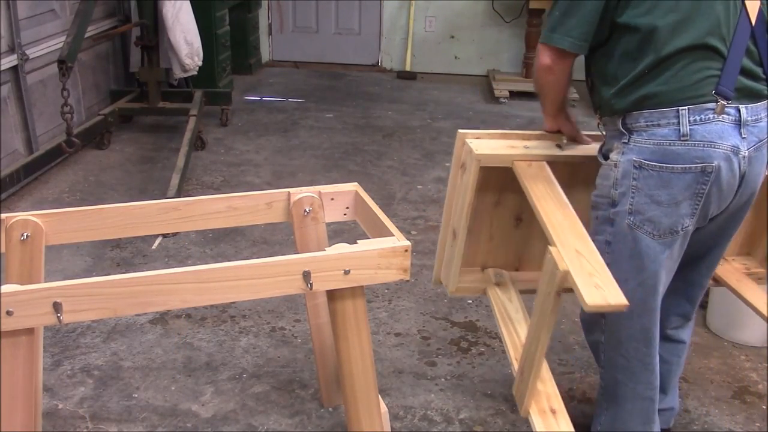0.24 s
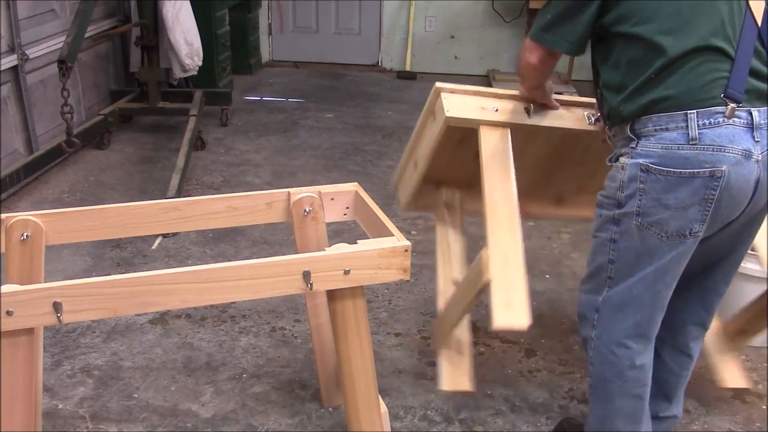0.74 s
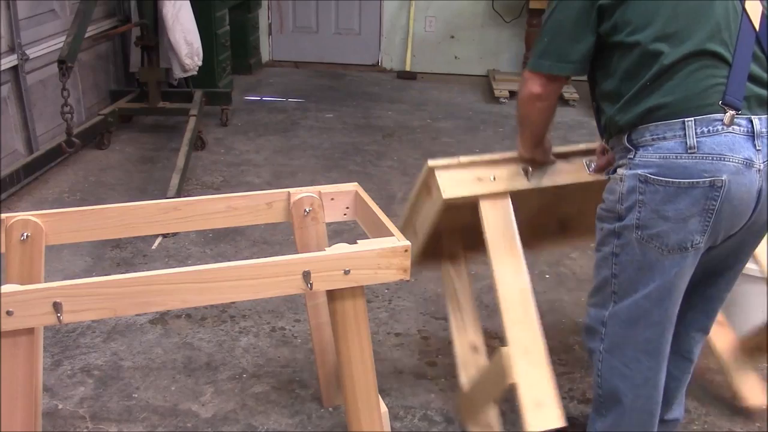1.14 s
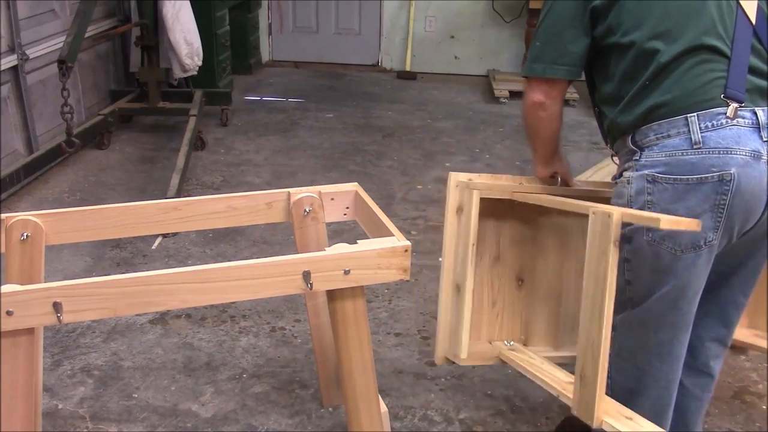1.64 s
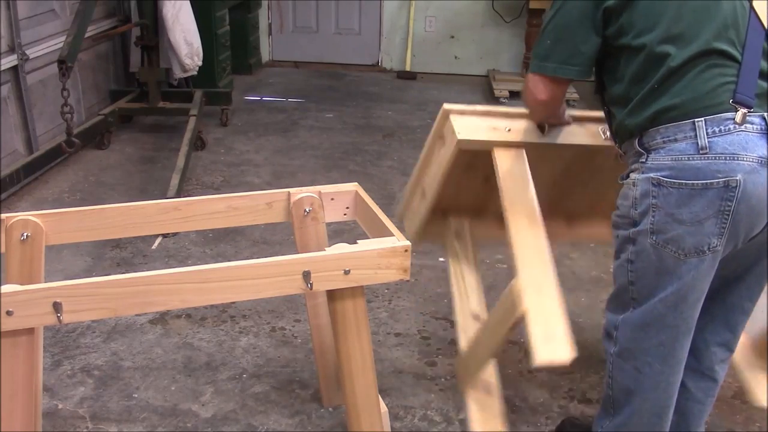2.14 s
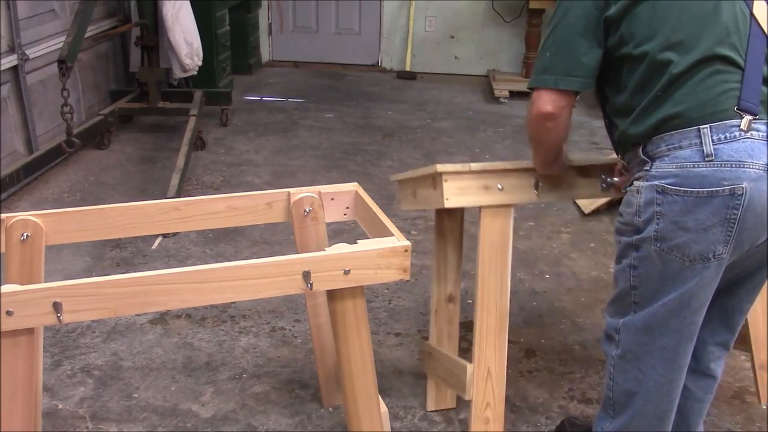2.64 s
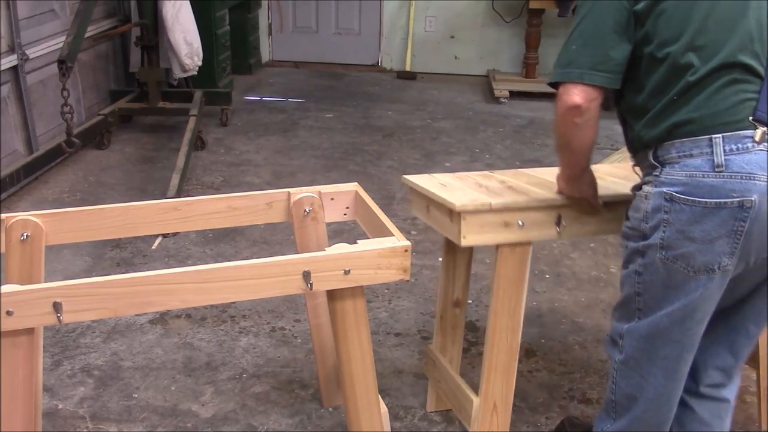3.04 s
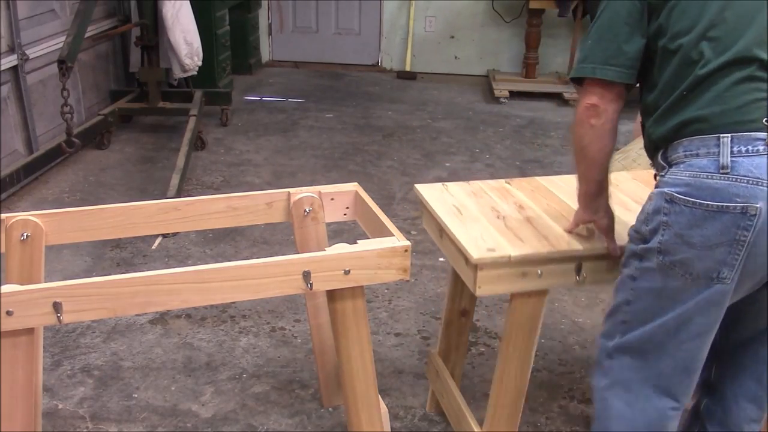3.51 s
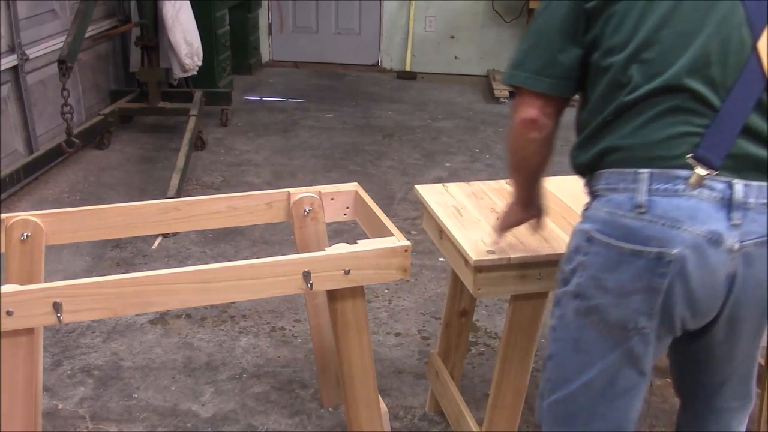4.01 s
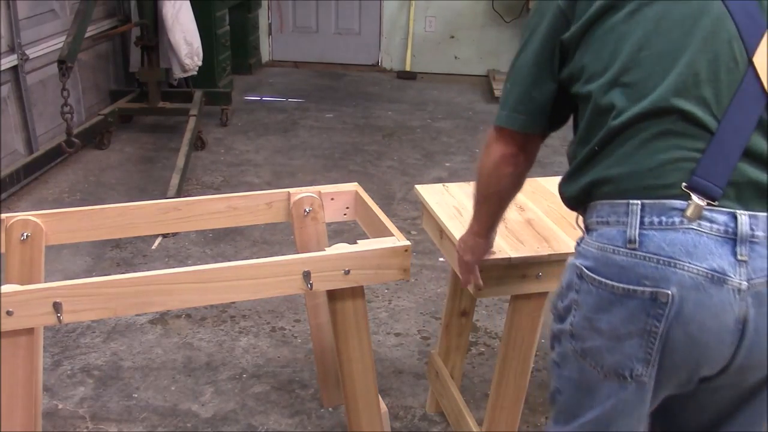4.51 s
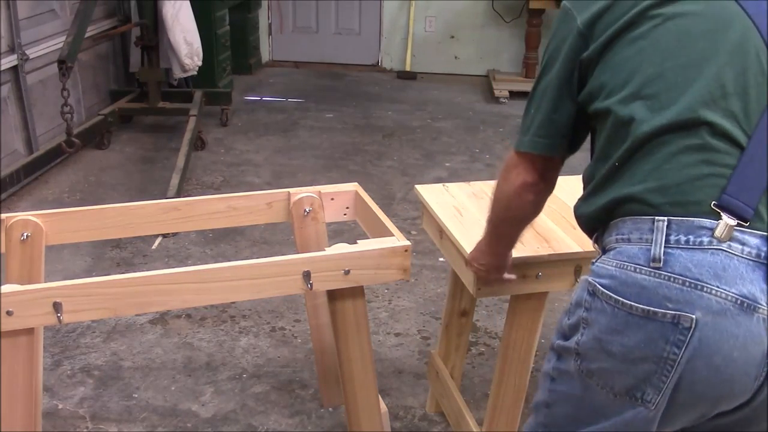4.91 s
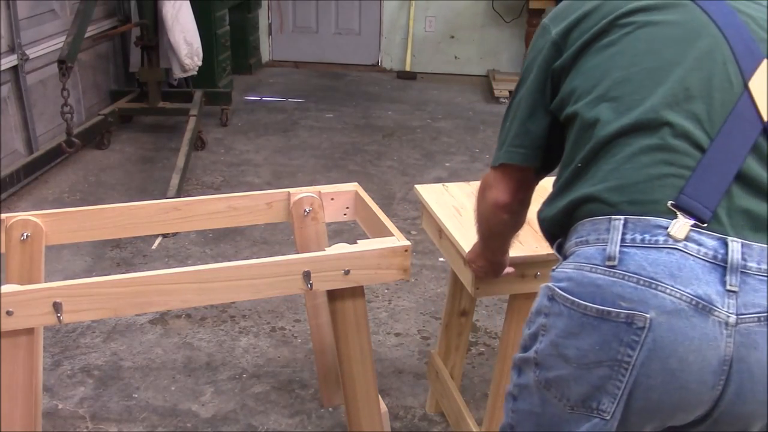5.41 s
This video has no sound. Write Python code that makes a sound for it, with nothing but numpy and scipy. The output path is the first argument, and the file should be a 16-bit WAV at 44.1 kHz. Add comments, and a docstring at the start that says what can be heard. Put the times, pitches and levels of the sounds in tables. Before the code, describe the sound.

A fan hums steadily in a hard, echoing workshop. Close to the microphone, a wooden table gives a quick cluster of knocks with leg judder, then after a pause a louder clattering landing on concrete. Gritty shoe scuffs follow, then a softer, boomier run of thumps, more scuffs and bright ticks, and at the end a short groaning wood scrape with small knocks.

```python
"""A fan drones with a wavering blade tone under thin airy hiss; then a wooden folding table is knocked,
set down and dragged on a concrete workshop floor. Blows ring table modes; judder and drag drive them with
random slips. Fittings tick (short noise bursts); airy hisses carry a thin gliding whistle; shoes scuff grit
(patchy filtered noise). Decaying noise makes the hall echo; gain control ducks loud blows."""
import sys
import numpy as np
from scipy import signal
from scipy.fft import rfft, irfft, next_fast_len
from scipy.io import wavfile
from scipy.ndimage import uniform_filter1d, minimum_filter1d, map_coordinates

SR = 44100
rng = np.random.default_rng(int(sys.argv[2]) if len(sys.argv) > 2 else 0)


def to_wav(s):
    """Save 16-bit WAV."""
    ch = np.atleast_2d(s).T  # columns
    pcm = np.round(np.clip(ch, -1, 1) * 32767)  # PCM
    wavfile.write(sys.argv[1], SR, pcm.astype(np.int16))


def invert_db(x):
    """Field ratio 10**(x/20) for x, a level in decibels (scalar or array-like)."""
    u = np.asarray(x, float) / 20
    return 10 ** u


N = 249606

# blows on the table: (time [s], relative strength [dB], boom of the top [dB], clack of the legs [dB],
# contact hardness [dB])
BLOWS = [(0.858, -3, -10, -10.5, -11.5), (0.874, -2.5, -12, -11, -29), (0.916, -11, -10, -9, -15),
         (0.957, -4, -20, -15, -21), (0.98, -10, -15, -15, -19), (1.014, -19, -5, 4.5, -5.5),
         (2.31, -3.5, -8.5, -5, -9.5), (2.34, -18, -4.5, -2.5, -2), (2.377, -8.5, -19, -3, -19),
         (2.396, 3, -4, 0.5, -19), (2.447, -6, 6, -8, -18), (2.475, 0, -25, -7.5, -26),
         (2.5, -1.5, -5, -36.5, -39), (2.525, -6, 0, -8.5, -29), (2.574, -8, 2, -17, -31),
         (3.523, -4.5, -1.5, -4.5, -23), (3.627, -3.5, -1, -4, -39), (3.658, -5, 4.5, -34.5, -43),
         (3.752, -11, -7, -16, -45), (3.793, -11.5, 7, -14, -34.5), (3.858, -11.5, 9, -22, -26),
         (3.909, -2, 3.5, -33, -39.5), (3.927, -6.5, 2, -29, -43.5), (4.134, -10.5, 0.5, -15, -21),
         (4.152, -19, -17.5, -16, -15), (5.336, -27, -19, -2.5, -8), (5.454, -9.5, -32, -17, -19.5),
         (5.486, -8.5, -36, -30.5, -21.5), (5.511, -9.5, -29, -11.5, -19), (5.55, -21.5, -26, -16, -1)]
# table modes, nominal: (frequency [Hz], level [dB], undamped t60 [s])
TABLE_MODES = [(83.4, -12, 0.46), (124, 3, 0.32), (180, -31, 0.05), (192.8, 3, 0.16), (239, -2, 0.1885),
               (258.6, -6.5, 0.2), (333, -1.5, .12), (362.2, -5.5, 0.24), (391.5, 1.5, 0.11),
               (433, -5, 0.097), (477.3, -5, 0.33), (536.2, 1.5, 0.032), (569, 2, 0.033), (674, -4, 0.043),
               (750, 0.5, 0.24), (793, -1, 0.068), (880, 2.5, 0.0363), (991.1, 1.5, 0.079),
               (1108, -3.5, 0.047), (1273, -5.5, 0.0171), (1682, -6, 0.072), (1843, -8.5, 0.048),
               (1954, -11, 0.054), (2395, -8.5, 0.079), (2910, -9.5, 0.0326), (3100, -29, 0.033),
               (3670, -15.5, 0.11), (4040, -11, 0.021)]
# legs juddering over the floor: (start [s], length [s], start level [dB], end level [dB],
# initial harshness [dB])
JUDDERS = [(.856, 0.256, -9.5, -27, -13.5), (2.309, 0.083, -11.5, -16, -7.5), (2.4, .32, -14.5, -29, -13.5),
           (3.625, 0.094, -16, -27, -28), (3.75, .19, -30, -25.5, -31.5)]
# loaded table dragged along: (start [s], length [s], start level [dB], end level [dB], joint rattle [dB])
DRAG_SPELLS = [(5.45, 0.094, -15, -14.5, -22), (5.55, 0.124, -10.5, -6.5, -19)]
# fittings and grit ticking: (time [s], relative level [dB], pitch [Hz])
TICK_EVENTS = [(0.7397, -28, 7800), (0.8224, -32.5, 3680), (0.9175, -12, 4060), (0.959, -10.5, 4470),
               (1.1305, -29, 3790), (2.442, -20, 3480), (2.4413, -7, 10300), (2.499, -15.5, 4060),
               (3.7938, -28.5, 6660), (4.3107, -5, 6300), (4.3153, -11, 8300), (5.548, -27, 3110)]
# airy hisses with a thin whistle: (start [s], length [s], start level [dB], end level [dB],
# nominal whistle [Hz])
HISS_SPELLS = [(0.02, 0.3, -46.5, -44.5, 12200), (.455, 0.029, -58, -55, 12000),
               (2.447, 0.24, -33, -52.5, 10350)]
# resonances of the hiss: (centre [Hz], width [Hz], level [dB])
HISS_PEAKS = [(2225, 270, -1.5), (5917, 470, -1.5), (8580, 680, -2.5), (10450, 980, -4), (12200, 1200, -7)]
# soles on concrete: (fastest moment [s], relative peak [dB], 20 dB rise [s], 20 dB fall [s],
# centre at the peak [Hz]); the sign of a rise has no effect
SOLE_SLIDES = [(.735, -29, 0.0648, 0.0753, 6200), (1.216, -16.5, 0.1176, 0.1865, 5400),
               (1.44, -27.5, .1, 0.08, 5400), (2.78, -30.5, 0.2, .12, 4700), (2.9, -21, 0.1274, 0.17, 5300),
               (3.125, -37.5, 0.27, .09, 4900), (3.36, -32.5, 0.14, 0.33, 6900),
               (3.5, -23, 0.12, 0.06, 6430), (3.645, -27, 0.01, 0.07, 6200),
               (4.11, -25.5, 0.1053, 0.08, 6220), (4.235, -11, 0.0744, .13, 4600),
               (4.32, -14.5, 0.0507, 0.09, 6200), (4.42, -40, -0.2, .15, 5600), (4.7, -36, -0.2, 0.1, 4400),
               (4.855, -15.5, 0.095, 0.25, 6650), (5.135, -32.5, 0.04, 0.1, 5100)]
# colour of a scuff: (frequency [Hz], density [dB per Hz])
SOLE_COLOUR = [(880, -10), (1500, -13), (2330, -11.5), (3030, -9.5), (4150, -8), (6310, -10.5),
               (7310, -9.5), (12800, -12.5), (14200, -22), (15500, -29.5)]
# hall decay: (frequency [Hz], t60 [s])
HALL_DECAY = [(100, 0.41), (1000, 1), (4000, 0.63), (12000, 0.56)]
# fan levels: (time [s], air [dB], blade tone [dB])
FAN_LEVELS = [(0, -26.5, -34.5), (.8, -28, -33.5), (1.5, -28, -45), (3, -26.5, -38), (5.66, -27, -41)]
# colour of the fan's air noise: (frequency [Hz], density [dB per Hz])
FAN_COLOUR = [(15, -45), (25, -17.5), (66, -3), (133, -7), (209, -0.5), (410, -1.5), (457, -2), (582, -4),
              (762, -5.5), (848, -6.5), (1300, -13.5), (1620, -19), (1850, -20.5), (11200, -37),
              (14000, -42.5), (15500, -54)]


def unit(x):
    """Scaled to rms 1."""
    return x / np.sqrt(np.mean(x ** 2) + 1e-20)


def along(points, hz):
    """(Hz, value) points read on a log axis."""
    f, v = np.transpose(points)
    return np.interp(np.log(hz + 1), np.log(f + 1), v)


def wobble(rate_hz):
    """Smooth random curve, rate_hz knots a second."""
    knots = rng.standard_normal(int(N * rate_hz / SR) + 4)
    return map_coordinates(knots, [np.arange(N) * rate_hz / SR])


def filtered(x, response):
    """x times a complex response of frequency."""
    m = next_fast_len(N + SR // 2)
    return irfft(rfft(x, m) * response(np.fft.rfftfreq(m, 1 / SR)), m)[:N]


def coloured(x, points):
    """x shaped by (Hz, dB) points."""
    return filtered(x, lambda f: invert_db(along(points, f)))


def resonant(peaks):
    """Causal response of (Hz, width Hz, dB) resonances of alternating sign."""
    def response(f):
        total = 0
        for k, (centre, width, db) in enumerate(peaks):
            damping = 1j * f * width
            total = total + (-1) ** k * invert_db(db) * damping / (centre * centre - f * f + damping)
        return total
    return response


def impulses(per_second, spread_db):
    """Sparse random impulses of uneven size."""
    hits = rng.random(N) < per_second / SR
    return hits * rng.standard_normal(N) * invert_db(spread_db * rng.exponential(size=N))


def spells(rows, fade_s):
    """Gain of all spells; the current one's own value, time since its start and time until its end."""
    t, gain, others = np.arange(N) / SR, np.zeros(N), 0
    for s, length, start_db, end_db, value in rows:
        edge = np.clip(np.minimum(t - s, s + length + fade_s - t) / fade_s, 0, 1)
        gain += edge * invert_db(np.interp(t, [s, s + length], [start_db, end_db]))
        others = np.where(edge > 0, [value + 0 * t, t - s, s + length - t], others)
    return gain, *others


def knocks():
    """Each blow gives a short push and rings every mode anew; hard contact excites high modes and cracks."""
    out, t = np.zeros(N + SR), np.arange(SR // 4) / SR
    hz, level_db, t60_s = np.transpose(TABLE_MODES)[..., None]
    dull = signal.butter(2, 4200, fs=SR)
    for s, db, boom_db, clack_db, hard_db in BLOWS:
        reach_db = along([(150, boom_db), (260, 0), (520, 0), (750, clack_db), (1200, clack_db + 3),
                          (1700, hard_db + 16.5), (4200, hard_db + 6.0)], hz)
        level_luck, pitch_luck, phase_luck = rng.standard_normal((3, len(TABLE_MODES), 1))
        contact_s = 0.0005 * invert_db(-.3 * clack_db)  # a soft landing lasts longer
        u = t / contact_s - 3
        push = (u * u - 1) * np.exp(-u * u / 2)
        rise = 1 - np.exp(-(t / (1.17 * contact_s)) ** 2)
        # a random phase walk in 64-sample steps roughens the higher modes
        walk = np.cumsum(rng.standard_normal((len(TABLE_MODES), len(t) // 64 + 1)), axis=1)
        rough = 0.000235 * hz * walk.repeat(64, axis=1)[:, :len(t)]
        # hands and floor shorten the ring, most when the table lands flat
        ring_t60_s = (.58 - 0.0095 * boom_db) * t60_s
        decay = invert_db(level_db + reach_db + 3.9 * level_luck - 60 * t / ring_t60_s)
        phase = 2 * np.pi * hz * (1 + 0.029 * pitch_luck) * t + rough + 1.577 * phase_luck
        modes = (decay * np.sin(phase)).sum(0)
        noise = signal.lfilter(*dull, rng.standard_normal(len(t)))
        crack = invert_db(hard_db + 16 - 60 * t / 0.037) * noise
        out[round(s * SR):][:len(t)] += invert_db(db - 8) * (invert_db(2) * push + rise * (crack + modes))
    return out[:N]


def shaken(per_second, spread_db, damping, boom_db, clack_db, rattle_db, grit_db):
    """Uneven slips drive each part's share of the modes; noise stands for the grit being ground."""
    slips = impulses(per_second, spread_db)

    def part(low_hz, high_hz):
        peaks = [(c, damping / t60, db) for c, db, t60 in TABLE_MODES if low_hz < c < high_hz]
        return unit(filtered(slips, resonant(peaks)))

    top, frame = part(0, 200), part(200, 600)
    legs, joints = part(600, 1400), part(1400, SR)
    noise = rng.standard_normal(N) * invert_db(1.8 * wobble(60))
    grind = unit(coloured(noise, [(1500, -20), (4000, -6.0), (9000, -9.5), (15000, -18)]))
    wood = invert_db(boom_db) * top + invert_db(-4.5) * frame + invert_db(clack_db) * legs
    return wood + invert_db(rattle_db - 3.5) * joints + invert_db(grit_db) * grind


def judder():
    """Feet stick and slip after a landing; one fading harshness sets the share of each part."""
    gain, harsh_db, since_s, _ = spells(JUDDERS, fade_s=0.0072)
    fade_db_per_s = 66  # dulls as it goes on
    rattle_db = harsh_db - fade_db_per_s * since_s
    boom_db = -20 - 0.53 * rattle_db  # soft, flat contact shakes the top
    clack_db = -1.5 + 0.43 * rattle_db
    grit_db = -15 + 0.56 * rattle_db
    return gain * shaken(1300, 1.5, 4.45, boom_db, clack_db, rattle_db, grit_db)


def drag():
    """Under load the slips come denser and more even, and the frame groans."""
    gain, rattle_db, *_ = spells(DRAG_SPELLS, fade_s=0.0103)
    boom_db, clack_db = -31, -19  # hands on the top damp it: mostly the frame sounds
    return gain * shaken(4000, 0.71, 3.4, boom_db, clack_db, rattle_db, rattle_db - 0.5)


def ticks():
    """Short bright noise bursts, each around one pitch."""
    out, t = np.zeros(N + SR), np.arange(SR // 10) / SR
    f = np.fft.rfftfreq(len(t), 1 / SR)
    t60_s, rise_s = 0.037, 0.00096
    for s, db, hz in TICK_EVENTS:
        colour = 1 / (1 + ((f - hz) / (0.14 * hz)) ** 2)
        colour += 0.4 * (f > 2200) / (1 + (f / 9000) ** 4)
        burst = unit(irfft(rfft(rng.standard_normal(len(t))) * colour, len(t)))
        envelope = invert_db(db - 3 - 60 * t / t60_s) * (1 - np.exp(-t / rise_s))
        out[round(s * SR):][:len(t)] += envelope * burst
    return out[:N]


def slides():
    """Summed gain of all scuffs, and their power-weighted centre frequency."""
    t = np.arange(N) / SR
    s, db, rise_s, fall_s, hz = np.transpose(SOLE_SLIDES)[..., None]
    swell_power = 1.57  # shape of the swell in dB: 1 pointed, 2 round
    down_db = 20 * abs((t - s) / np.where(t < s, rise_s, fall_s)) ** swell_power
    power = invert_db(db - down_db) ** 2
    slowed_hz = hz * np.exp(-.008 * down_db)  # the centre drops as the slide slows
    centre_hz = (power * slowed_hz).sum(0) / (power.sum(0) + 1e-20)
    return np.sqrt(power.sum(0)), centre_hz


def scuffs():
    """Grit crushed under a sliding sole: patchy hiss with fine grains, its emphasis moving with speed."""
    gain, centre_hz = slides()
    grains = rng.standard_normal(N) + .5 * unit(impulses(per_second=3000, spread_db=1.4))
    f, t, z = signal.stft(coloured(grains, SOLE_COLOUR), SR, nperseg=512)
    patches = uniform_filter1d(rng.standard_normal(z.shape), 8, 0)
    patches = unit(uniform_filter1d(patches, 4, 1))
    centre = np.clip(np.interp(t, np.arange(N) / SR, centre_hz), 3000, None)
    # a faster slide moves the emphasis up and lifts the treble
    emphasis_db = 5 * np.exp(-(np.log((f[:, None] + 1) / centre) / 0.67) ** 2)
    tilt_db = 3 * np.log(centre / 5500) * np.log((f[:, None] + 500) / 5500)
    z = z * invert_db(emphasis_db + tilt_db + 2.75 * patches)
    hiss = signal.istft(z, SR, nperseg=512)[1][:N]
    return gain * invert_db(0.41 * wobble(24.69) - 5.5) * unit(hiss)


def airy_hisses():
    """Noise through fixed resonances, with a thin gliding whistle of unsteady level."""
    gain, pitch_hz, _, left_s = spells(HISS_SPELLS, fade_s=0.016)
    sag_s, sag_share = .065, .13  # the whistle falls at the end
    whistle_hz = pitch_hz * (1 - sag_share * np.clip(1 - left_s / sag_s, 0, 1))
    whistle_hz = whistle_hz + 120 * wobble(150) + 150 * wobble(25)
    noise = rng.standard_normal(N) * invert_db(1.3 * wobble(40.08))
    hiss = unit(filtered(noise, resonant(HISS_PEAKS)))
    whistle = invert_db(3.4 * wobble(29.3)) * np.sin(2 * np.pi * np.cumsum(whistle_hz) / SR)
    return gain * (invert_db(2.5) * hiss + invert_db(-5.5) * whistle)


def hall(x):
    """Each frequency of the echo dies at its own speed; the noise tail is drawn anew every quarter second."""
    out, step = np.zeros(N + 2 * SR), SR // 4
    for start in range(0, N, step):
        hz, t, z = signal.stft(rng.standard_normal(SR // 2), SR, nperseg=256)
        z = z * invert_db(-60 * t / along(HALL_DECAY, hz)[:, None])
        tail = signal.istft(z, SR, nperseg=256)[1]
        wet = signal.fftconvolve(x[start:start + step], tail / np.linalg.norm(tail))
        out[start + 300:][:len(wet)] += wet  # delay in samples
    return out[:N]


def fan():
    """Broad noise of moving air with a blade tone wavering around 404 Hz."""
    s, air_db, tone_db = np.transpose(FAN_LEVELS)
    t = np.arange(N) / SR
    air = unit(coloured(rng.standard_normal(N), FAN_COLOUR))
    tone = np.sqrt(2) * np.sin(2 * np.pi * np.cumsum(404 + 4 * wobble(14)) / SR)
    air_gain = invert_db(np.interp(t, s, air_db) + 2.0 * wobble(4.474))
    tone_gain = invert_db(np.interp(t, s, tone_db) + 3.47 * wobble(10))
    return air_gain * air + tone_gain * tone


def scene():
    """Table, ticks, scuffs and airy hisses close by, their hall echo 6 dB down, over the fan."""
    near = knocks() + judder() + drag() + ticks() + scuffs() + airy_hisses()
    return (near + invert_db(-6) * hall(near) + fan())[None]


def roll_off(x):
    """The treble ends steeply here."""
    return signal.sosfilt(signal.butter(12, 15660, fs=SR, output="sos"), x)


def record(dry):
    """Microphone cuts deep bass and top treble; gain control ducks peaks, holds, then creeps back."""
    heard = signal.sosfilt(signal.butter(2, 65, "high", fs=SR, output="sos"), dry)
    heard = signal.sosfilt(signal.butter(6, 15200, fs=SR, output="sos"), heard)
    need = np.minimum(1, invert_db(-0.58) / (abs(heard[0]) + 1e-9))
    held = minimum_filter1d(need, size=1800, origin=700)
    gain = uniform_filter1d(held, size=200)
    recovery_s = .07
    keep = np.exp(-1 / (recovery_s * SR))
    gain = np.minimum(gain, 1 - signal.lfilter([1 - keep], [1, -keep], 1 - gain))
    return roll_off(heard * gain)


dry = scene()
out = record(dry)
to_wav(out)
```